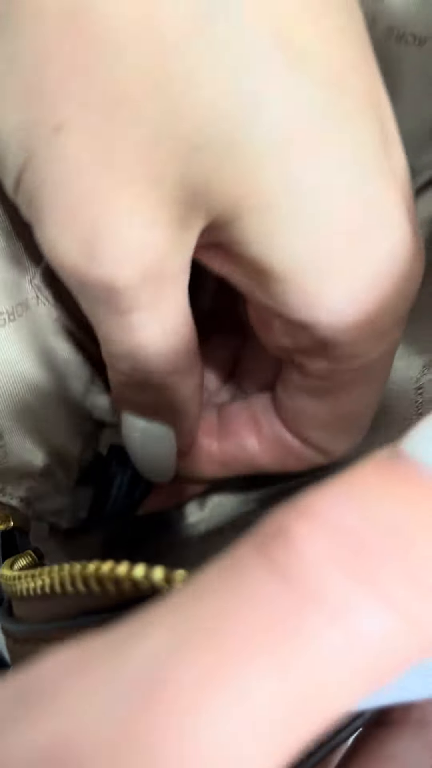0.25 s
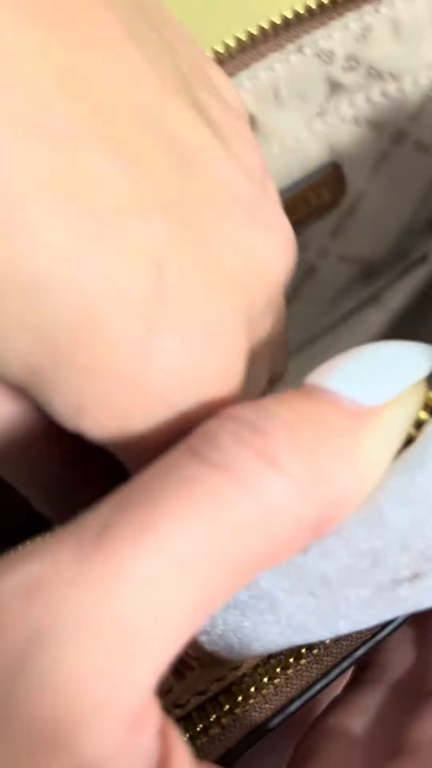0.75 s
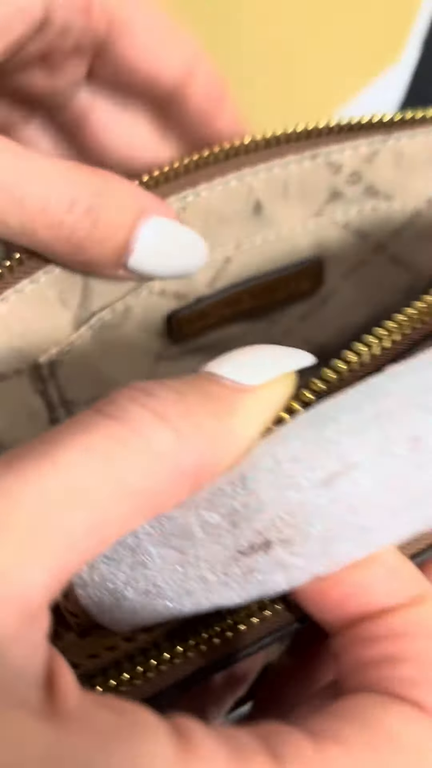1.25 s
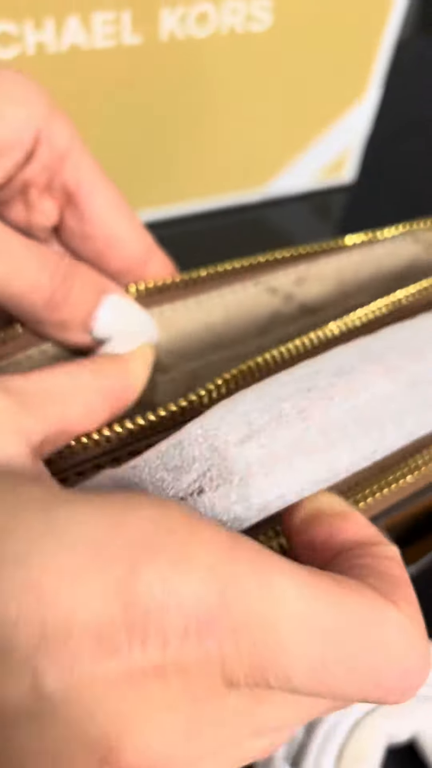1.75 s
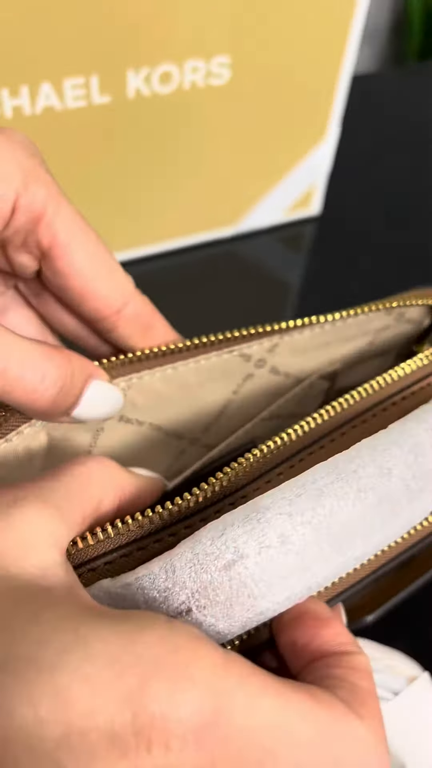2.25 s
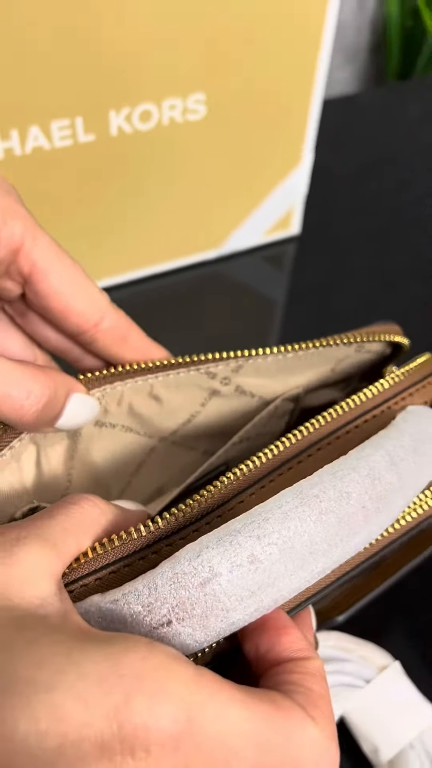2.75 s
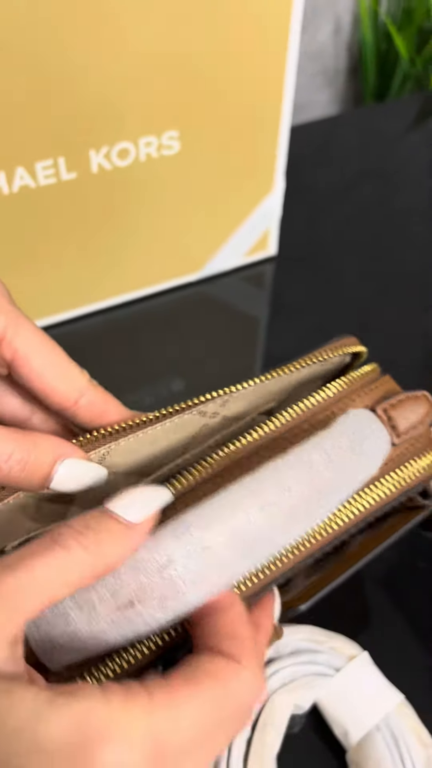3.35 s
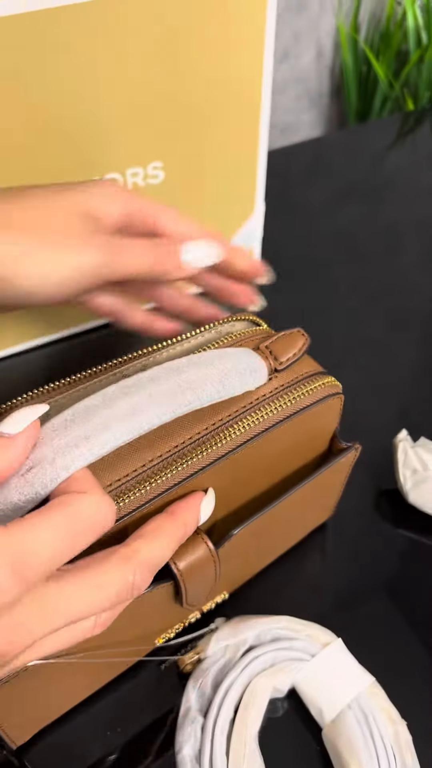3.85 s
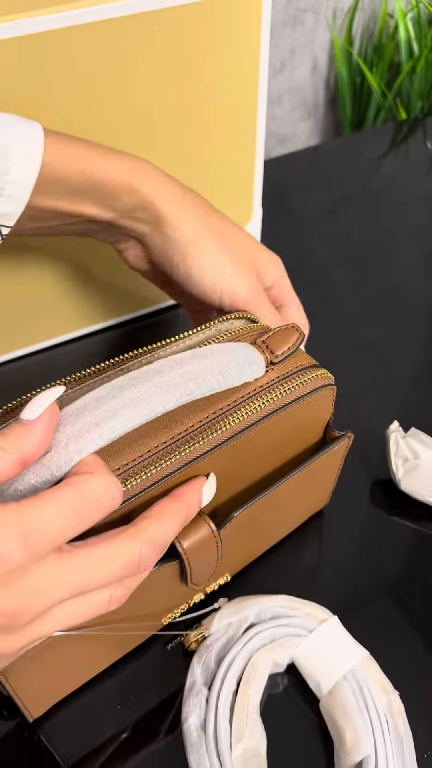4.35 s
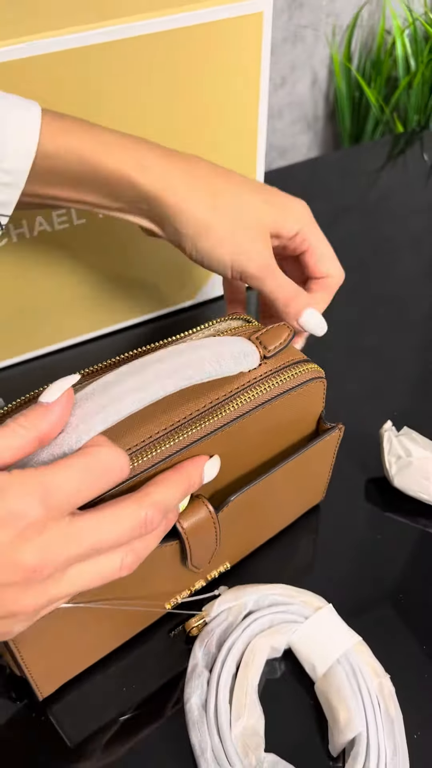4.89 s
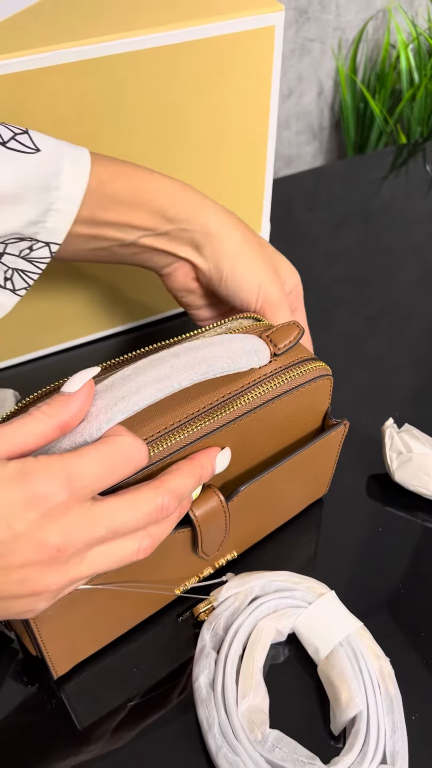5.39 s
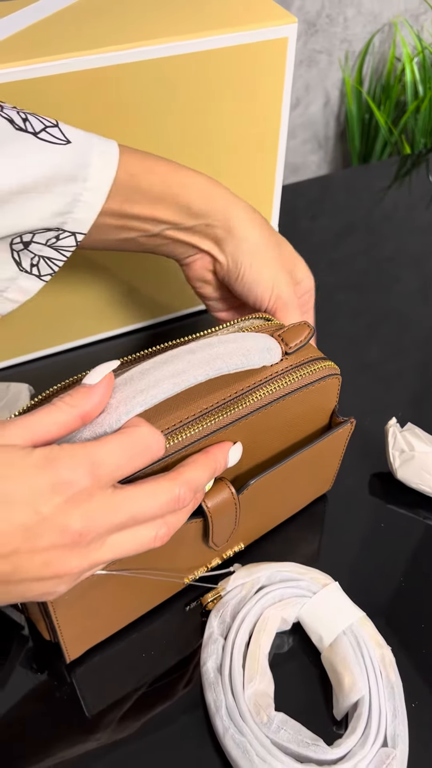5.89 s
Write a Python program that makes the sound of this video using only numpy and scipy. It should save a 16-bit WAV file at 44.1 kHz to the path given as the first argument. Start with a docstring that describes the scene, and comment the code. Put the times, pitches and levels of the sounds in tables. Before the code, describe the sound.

A close, dry recording in a small quiet room, with soft air murmur and a faint low hum throughout. From 0 to 1 s, fingers brush cloth lining in uneven swells, with quick little leather pops, low jostling and bright nail ticks. At about 1.0 s a fastener snaps shut, loud, crisp and briefly ringing; brushing peaks just after. Around 1.25 s a finger squeaks for a moment, turning raspy, and a much weaker snap follows at 1.4 s. Soft low double bumps on the table come at 1.5 and 1.6 s, another near 2.4 s among nail clicks. It is almost still from 2.5 to 3 s, then light rustling and creasing return. A firm leather pop at 4.0 s begins stronger creaking; zip metal jingles at 4.4 to 4.5 s. The hardest pop lands at 4.8 s, another at 5.0 s, then sparse ticks and a last jingle with pops near 5.9 s.

```python
"""Hands explore a small leather bag on a table in a quiet room, close to the microphone.
First fingers brush the cloth lining (filtered noise) among leather pops (buckling, falling pitch) and nail ticks.
From 1 s a fastener snaps twice (chatter and ringing modes), a finger squeaks (stick-slip), the bag bumps the table.
From 4 s the gripped leather pops and creaks hardest, and a metal zip pull jingles (dying partials).
Under it all lie a low jostling, the murmur of the room's air and a steady hum."""
import sys
import numpy as np
from scipy import signal
from scipy.fft import rfft, irfft
from scipy.io import wavfile
from scipy.ndimage import uniform_filter1d

SR = 44100
rng = np.random.default_rng(int(sys.argv[2]) if len(sys.argv) > 2 else 0)


def persist_wave(psi):
    """Save psi, clipped to +-1, as 16-bit WAV."""
    counts = np.round(np.clip(psi, -1, 1) * 32767).astype(np.int16)
    wavfile.write(sys.argv[1], SR, np.atleast_2d(counts).T)


N = 270333
TIME = np.arange(N) / SR  # s

# effort of the fingers brushing the cloth lining: (time [s], level [dB])
BRUSHING_EFFORT = [(0, -69.5), (.13, -61), (.36, -59.5), (.53, -53.5), (.75, -58), (.8, -69.5),
                   (.98, -60.5), (1.1, -51), (1.38, -69.5), (1.62, -56.5), (1.88, -64.5), (2.1, -69),
                   (2.38, -65), (2.55, -82), (2.95, -80.5), (3.11, -69.5), (3.29, -74), (3.42, -63.5),
                   (3.5, -66.5), (3.7, -58), (3.8, -66.5), (3.93, -63), (4.5, -75), (4.95, -94),
                   (5.17, -73), (5.48, -79), (5.67, -71.5), (5.8, -92), (6.13, -82)]
# effort of the grip rubbing the leather: (time [s], level [dB])
RUBBING_EFFORT = [(0, -67.5), (.28, -57.5), (.36, -68.5), (.49, -63), (.72, -60.5), (.82, -68.5),
                  (1.05, -59.5), (1.47, -58), (1.76, -60), (2.3, -79.5), (2.6, -100), (2.95, -84),
                  (3.22, -71.5), (3.3, -82), (3.65, -71), (3.98, -71.5), (4.04, -58.5), (4.29, -58.5),
                  (4.34, -60), (4.43, -62.5), (4.62, -67), (4.85, -58), (5.2, -67), (5.3, -71.5),
                  (5.5, -67), (5.6, -66.5), (5.77, -67.5), (5.84, -83), (5.91, -60.5), (5.97, -61),
                  (6.13, -65.5)]
# bending modes of the table: (frequency [Hz], relative level [dB], T60 [s])
TABLE_MODES = [(74, 0, 0.15), (181, -3, 0.26), (241, -2.5, 0.33), (292, -5, 0.28)]
# the bag's hollow body colours pops and creases: (frequency [Hz], relative level [dB])
PANEL_COLOUR = [(100, -1), (300, 0.5), (450, 2), (680, -7), (980, -1), (1500, -3.5), (2200, 2.5), (4000, 0)]
# air and walls of the bag, ringing on after a pop: (frequency [Hz], relative level [dB], T60 [s])
HOLLOW_MODES = [(390, -4, 0.13), (453, -3, 0.12), (485, -1.5, 0.26), (587.7, -4, 0.048), (654, 3, 0.16),
                (745, -5, .1)]
# dull body of a nail tick or a zip pull's knock: (frequency [Hz], relative density [dB per Hz])
DULL_COLOUR = [(150, -24), (500, -6.5), (1200, -0.5), (2200, -0.5), (4000, -24.5), (9000, -47.5)]


def gain_of(db):
    """Level definition: decibels to amplitude ratio."""
    return 10 ** (np.asarray(db) / 20)


def evened(x):
    """Power normalization: scales a signal to rms 1."""
    return x / np.sqrt(np.mean(x ** 2) + 1e-20)


def read(points, hz):
    """Interpolation on a logarithmic frequency axis."""
    table_hz, value = np.transpose(points)
    return np.interp(np.log(hz + 1), np.log(table_hz + 1), value)


def level_at(curve, s):
    """Linear interpolation of a level curve at times s."""
    return np.interp(s, *np.transpose(curve))


def add(mix, s, sound):
    """Superposition: mixes a sound in at time s."""
    part = mix[max(round(s * SR), 0):][:len(sound)]
    part += sound[:len(part)]


def colour(x, spectrum):
    """Minimum-phase filtering: the log spectrum fixes the phase of a causal response of unit energy."""
    hz = abs(np.fft.fftfreq(4096, 1 / SR))
    log_gain = np.log(gain_of(read(spectrum, hz)))
    minimum_phase = np.exp(np.conj(signal.hilbert(log_gain)))
    taps = np.fft.ifft(minimum_phase).real[:2048]
    return signal.oaconvolve(x, taps / np.linalg.norm(taps))[:len(x)]


def ring(x, modes):
    """Modal resonance: drives a set of exponentially dying sines of unit energy in all."""
    t = TIME[:SR // 2]
    response = sum(gain_of(db - 60 * t / t60) * np.sin(2 * np.pi * hz * t) for hz, db, t60 in modes)
    return signal.oaconvolve(x, response / np.linalg.norm(response))[:N]


def chatter(length, steep=1):
    """Contact noise: two hard parts meet in a run of tiny, uneven contacts that dies away."""
    t = TIME[:SR // 10]
    fade = np.exp(-(t / max(length, 1 / SR)) ** steep)
    burst = rng.standard_normal(len(t)) * fade
    return burst * np.linalg.norm(fade) / np.linalg.norm(burst)


def grains(per_s, spread_db):
    """Shot noise: sparse catches of very uneven size, rms 1."""
    size = gain_of(spread_db * np.minimum(rng.exponential(1, N), 4))
    sign = rng.choice([-1, 1], N)
    return evened(size * sign * (rng.random(N) < per_s / SR))


def strays(curve, per_s, over_db):
    """Random arrivals: small contacts whose level follows a hand's effort; rows (time [s], level [dB])."""
    spread_db, resting_effort_db = 4, -91  # even resting fingers make a few small contacts
    chance, size = rng.random(N), rng.standard_normal(N)
    at = chance < per_s / SR
    effort_db = np.maximum(level_at(curve, TIME[at]), resting_effort_db)
    return zip(TIME[at], effort_db + over_db + spread_db * np.clip(size[at], -2, 2))


def flex(hz, sag, rise, swell, steep):
    """Dispersion: fast bending waves arrive first, so the pitch falls. sag, rise and swell are in cycles."""
    cycles = hz * TIME[:SR // 15]
    envelope = (1 - np.exp(-cycles / rise)) * np.exp(-(cycles / swell) ** steep)
    return envelope * np.sin(2 * np.pi * sag * np.log1p(cycles / sag))


def ports(near, other=None):
    """Interaural coherence at two microphone ports; a second, unrelated signal makes the sound diffuse."""
    # likeness of diffuse sound at the ports: (frequency [Hz], coherence [1])
    likeness = [(80, 0.98), (300, 0.41), (1000, 0.46), (2500, 0.12), (4500, 0.079), (6200, 0.5), (7800, .9),
                (10000, 0.096), (12500, 0.99), (15500, 1)]
    # lead of the left port: (frequency [Hz], phase [rad])
    port_phase = [(100, 0), (600, .2), (1500, .3), (4500, -.6), (7000, -.3), (8500, -.75), (10000, -1.6),
                  (11500, -2.6), (12500, -3.05), (15000, -3.0), (16000, -2.3)]
    hz, left = np.fft.rfftfreq(2 * N, 1 / SR), rfft(near, 2 * N)
    right = left
    if other is not None:
        same = np.clip(read(likeness, hz), -1, 1)
        right = same * left + np.sqrt(1 - same ** 2) * rfft(other, 2 * N)
    return irfft([left, right * np.exp(-1j * read(port_phase, hz))])[:, :N]


def room(x, wet_db):
    """Reverberation: direct sound plus a small room's tail, each band dying at its own speed."""
    # reverberation time: (frequency [Hz], T60 [s])
    decay_times = [(150, 0.42), (500, 0.24), (1500, 0.18), (4000, 0.27), (10000, 0.11), (16000, 0.1)]
    taps = rng.standard_normal((2, SR // 2)) * (rng.random((2, SR // 2)) < .15)  # sparse echoes
    taps *= np.clip(TIME[:SR // 2] / 0.0017, 0, 1) ** 2  # which build up over 1.7 ms
    hz, t, bands = signal.stft(taps, SR, nperseg=256)
    decay = gain_of(-60 * t / read(decay_times, hz)[:, None])
    tails = signal.istft(bands * decay, SR)[1]
    echoes = (signal.oaconvolve(x, tail / np.linalg.norm(tail))[:N] for tail in tails)
    return ports(x) + gain_of(wet_db) * ports(*echoes)


def snaps():
    """Impact excitation: the fastener chatters shut, rings, and shakes the table a little."""
    # fastener closures: (time [s], relative level [dB], chatter decay [s])
    closures = [(1.026, -7.5, 0.0055), (1.4309, -23, 0.011)]
    # modes of the fastener: (frequency [Hz], relative level [dB], T60 [s])
    fastener_modes = [(1560, -16.5, 0.14), (2338, 1, 0.11), (2600, -1, 0.1), (2708, -3, .09),
                      (3157, -3.5, 0.1), (3286, -2, .14), (3543, 1, 0.11), (4007, 0, 0.075),
                      (5547, -3, .09), (6165, -2, .11), (6278, -6, .11), (6479, -2, .1), (7735, -4.5, 0.13),
                      (8316, -3, 0.1)]
    # chatter: (frequency [Hz], relative density [dB per Hz])
    snap_colour = [(80, -28), (200, -11), (450, -13), (900, -12), (1300, -11), (1800, -13.5), (2500, -10),
                   (3600, -6.5), (4800, -10), (6000, -8.5), (8500, -11.5), (11000, -13.5), (13000, -12.5),
                   (16000, -23.5)]
    # snap as the folds scatter it: (frequency [Hz], relative density [dB per Hz])
    scatter_colour = [(700, -28.5), (1500, -16.5), (2400, -2), (4500, -2.5), (6500, -14), (16000, -32.5)]
    blows, strikes = np.zeros((2, N)), np.zeros(N)
    for s, db, length in closures:
        add(strikes, s, gain_of([db]))
        for path in blows:
            add(path, s, gain_of(db) * chatter(length, steep=1.8))
    crack = gain_of(-3.5) * colour(blows[0], snap_colour)
    ringing = gain_of(8) * ring(strikes, fastener_modes)
    shaking = gain_of(-4.0) * ring(strikes, TABLE_MODES[2:])
    # the bag's folds send the upper middle unevenly to the ports
    scattered = gain_of(-9.0) * colour(blows[1], scatter_colour)
    return room(crack + ringing + shaking, wet_db=-4.0) + np.array([scattered, -scattered])


def pops():
    """Buckling instability: stiff leather gives way with a falling knock and a little grit."""
    # panel pops: (time [s], relative level [dB], starting pitch [Hz], length [cycles])
    panel_pops = [(0.019, -45, 2300, 6.3), (0.1044, -39, 1790, 12), (0.207, -44, 1580, 9.2),
                  (0.251, -42.5, 1304, 12), (0.393, -44, 2900, 5.3), (0.448, -41, 2100, 21),
                  (0.48, -40.5, 1460, 10), (0.501, -45, 2000, 8), (0.526, -43, 3020, 6.8),
                  (0.572, -45, 2420, 12), (0.615, -44, 2570, 12), (0.64, -46, 2730, 6.3),
                  (0.654, -35, 2780, 5.4), (0.679, -44, 1890, 10), (0.713, -51.5, 2000, 8),
                  (1.22, -32, 1950, 19), (1.359, -44, 1520, 7.8), (1.384, -43, 2500, 6.9),
                  (1.402, -46, 1790, 7.2), (2.839, -56, 1484, 8.3), (3.134, -52.5, 1590, 7.3),
                  (3.211, -48, 2500, 7), (3.654, -41.5, 2610, 6.4), (4.011, -25, 2270, 18.4),
                  (4.085, -39, 2200, 12), (4.197, -41, 2410, 12), (4.2229, -30.5, 2890, 9),
                  (4.24, -36.5, 2890, 16), (4.255, -34, 2900, 10), (4.271, -37.5, 2540, 14),
                  (4.3095, -49, 2700, 11), (4.397, -35.5, 1740, 13.4), (4.407, -36, 1800, 13),
                  (4.529, -36.5, 1630, 16), (4.549, -37, 1540, 9.7), (4.562, -44.5, 1800, 14),
                  (4.664, -53, 2400, 8), (4.719, -48, 1500, 8), (4.8117, -10.5, 2106, 16.7),
                  (4.9909, -23, 1930, 18), (5.051, -45, 2050, 12), (5.107, -35.5, 1870, 16),
                  (5.15, -41.5, 2393, 13.3), (5.1735, -34.5, 2000, 25), (5.223, -49, 2200, 10),
                  (5.571, -45, 2390, 7.4), (5.578, -41.5, 3000, 11), (5.597, -47.5, 3000, 7),
                  (5.756, -50, 1600, 9), (5.897, -33, 1680, 15), (5.912, -43, 1180, 12),
                  (5.958, -37.5, 1720, 17), (6.0, -48, 2430, 10), (6.061, -44.5, 2400, 6.2)]
    # grit: (frequency [Hz], relative density [dB per Hz])
    grit_colour = [(60, -15.5), (150, 4), (260, 7.5), (420, 10), (1800, 3), (2900, -6.5), (4000, -17.5),
                   (9000, -43.5), (16000, -27.5)]
    small_per_s, small_over_db, small_hz, small_cycles = 17, 3.5, 1970, 3  # short stray pops while rubbing
    grit_db, grit_follows = -25, 0.62  # grit of a 0 dB pop; dB of grit per dB of pop
    knock, grit = np.zeros((2, N))
    small = [(s, db, small_hz, small_cycles) for s, db in strays(RUBBING_EFFORT, small_per_s, small_over_db)]
    for s, db, hz, cycles in panel_pops + small:
        add(knock, s, gain_of(db) * flex(hz, sag=4.3, rise=1.5, swell=cycles, steep=4))
        # softer pops hold a larger share of grit, up to a limit
        level_db = min(grit_db + grit_follows * db, db - 9.5)
        add(grit, s, gain_of(level_db) * chatter(0.0032))
    body = gain_of(-7.0) * colour(knock, PANEL_COLOUR) + gain_of(-35.0) * ring(knock, HOLLOW_MODES)
    return room(body + gain_of(2.0) * colour(grit, grit_colour), wet_db=-10.0)


def crunches():
    """Cascading buckling: squeezed leather gives way in tiny creases, each a miniature pop, over fine grit."""
    # squeezes: (time [s], length [s], relative level [dB], pitch of the creases [Hz])
    squeezes = [(0.48, 0.028, -64, 1670), (1.334, 0.18, -58.5, 940), (2.365, 0.031, -49, 1607),
                (3.08, 0.079, -61, 1700), (3.179, 0.067, -58.5, 1600), (3.523, 0.072, -62, 1920),
                (3.601, 0.1, -54.5, 1880), (3.703, 0.058, -51.5, 1880), (3.761, 0.055, -58.5, 1300),
                (4.171, 0.15, -55.5, 1090), (4.378, 0.048, -50.5, 1300), (4.526, 0.051, -64, 1195),
                (4.746, 0.046, -56, 2304), (4.785, 0.029, -44.5, 1382), (5.9, 0.017, -52.5, 945),
                (5.932, 0.06, -53.5, 1030)]
    # grit of creasing leather: (frequency [Hz], relative density [dB per Hz])
    grit_colour = [(150, -36.5), (400, 12), (1000, 2.5), (2000, 5.5), (3500, -4.5), (7000, -7),
                   (11000, -9.5), (14000, -13)]
    creases_per_s, spread_db, spread_oct = 220, 10, .8
    squeeze, creases = np.zeros((2, N))
    for s, length, db, hz in squeezes:
        add(squeeze, s, gain_of(db) * signal.windows.tukey(int(length * SR), .6))
        chance = rng.uniform(-1.3, 1, size=(100, 4))
        for at, (late, size, pitch, side) in zip(np.arange(0, length, 1 / creases_per_s), chance):
            strength = np.sqrt(np.sin(np.pi * at / length)) * gain_of(db + spread_db * size)
            crease = flex(hz * 2 ** (spread_oct * pitch), sag=4.3, rise=.8, swell=3.5, steep=2)
            add(creases, s + at + late / creases_per_s, np.sign(side) * strength * crease)
    grit = colour(squeeze * grains(per_s=1500, spread_db=3), grit_colour)
    body = gain_of(2) * colour(creases, PANEL_COLOUR) + gain_of(-24) * ring(creases, HOLLOW_MODES)
    return room(body + gain_of(-8.5) * grit, wet_db=-9)


def jingles():
    """Modal detuning: the zip pull scrapes and knocks; the grip shifts its partials at every contact."""
    # the pull knocks on its ring: (time [s], relative level [dB], dull knock against the bag re level [dB],
    # ringing that the fingers leave undamped re level [dB])
    tugs = [(4.372, -23.5, -5.5, -17), (4.386, -29, -10, -8), (4.395, -22, -19, -5.5), (4.414, -41, -5, -5),
            (4.523, -26, -9, -8), (4.529, -31, -3, 0), (4.796, -46, 1, 0), (4.8, -34, -4, -7),
            (4.811, -32, -5, -9), (4.828, -37, -3, -4), (5.726, -43, -8, -14), (5.7345, -29, -13.5, -5),
            (5.879, -30.5, -12, -11), (5.886, -34.5, -8, -6), (5.894, -24.5, -20.5, 2.5),
            (5.911, -41, -7, -2)]
    # modes of the pull: (frequency [Hz], relative level [dB], T60 [s])
    pull_modes = [(7270, 8, 0.16), (7180, 5, 0.13), (9950, 6, 0.06), (10400, 7, .035), (11600, 7, 0.03),
                  (15560, 15, 0.11), (15350, 10, .05)]
    # scrape: (frequency [Hz], relative density [dB per Hz])
    rattle_colour = [(800, -5), (2500, -11.5), (4000, -5.5), (7000, -3.5), (8500, -2), (10000, 1.5),
                     (11700, 13), (13500, 0), (15500, 4.5), (16300, -17)]
    rattle, knock, singing = np.zeros((3, N))
    t = TIME[:SR // 4]
    onset = np.minimum(TIME[:SR // 10] / 0.0033, 1)  # each contact has a soft onset of 3.3 ms
    hz, mode_db, t60 = np.transpose(pull_modes)[:, :, None]
    shifts = rng.standard_normal((len(tugs), 2, len(pull_modes), 1))
    for (s, db, knock_db, ring_db), (grip, force) in zip(tugs, shifts):
        add(rattle, s, gain_of(db) * onset * chatter(0.0032, steep=1.5))
        add(knock, s, gain_of(db + knock_db) * onset * chatter(0.0022, steep=3.7))
        envelope = gain_of(mode_db + 2 * force - 60 * t / t60)
        partials = envelope * np.sin(2 * np.pi * hz * (1 + .006 * grip) * t)
        add(singing, s, gain_of(db + ring_db) * partials.sum(0))
    metal = gain_of(-6.0) * colour(rattle, rattle_colour) + gain_of(-34) * singing
    return room(metal + gain_of(-3.5) * colour(knock, DULL_COLOUR), wet_db=-4.0)


def bumps():
    """Momentum transfer: soft low double blows with a dull scuff, which leave the table humming."""
    # the bag meets the table: (time [s], relative level [dB], starting pitch [Hz])
    landings = [(0.271, -49, 392), (1.218, -48.5, 363), (1.461, -29, 215), (1.582, -27, 255.4),
                (2.383, -37.5, 263.3), (3.716, -44, 310), (5.175, -50, 397), (5.728, -48.5, 266)]
    rock_s, rock_db = 0.01203, -4.5  # the bag rocks onto its other edge just after it lands
    # scuff: (frequency [Hz], relative density [dB per Hz])
    scuff_colour = [(60, -32), (280, 7.0), (450, -8.0), (1200, -29.5)]
    push, scuff = np.zeros((2, N))
    for s, db, hz in landings:
        blow = gain_of(db) * flex(hz, sag=1.5, rise=1, swell=3.1, steep=3)
        add(push, s, blow)
        add(push, s + rock_s, gain_of(rock_db) * blow)
        add(scuff, s, gain_of(db) * chatter(0.024))
    thud = gain_of(4.5) * push + gain_of(-13.5) * colour(scuff, scuff_colour)
    return room(thud + gain_of(-14.5) * ring(push, TABLE_MODES), wet_db=-15.0)


def ticks():
    """Hard contact: a nail on zip teeth or trim gives a bright edge and a duller body beneath it."""
    # nail clicks: (time [s], relative level [dB], body re edge before colouring [dB])
    clicks = [(0.02, -44, -32.5), (0.077, -48, -11), (0.261, -40.5, -22), (0.512, -38, -29),
              (0.756, -41.5, -32), (0.836, -41, -32), (0.9291, -40.5, -13), (0.983, -37, -14),
              (1.189, -38, -36), (1.734, -33, -23), (1.805, -43.5, -19.5), (2.034, -59, -10),
              (2.164, -44.5, -4), (2.178, -42, -12.5), (2.241, -40.5, -28.5), (2.257, -29, -18),
              (2.3452, -36.5, -15), (2.3516, -32.5, -12.5), (2.392, -48, -23.5), (2.426, -31.5, -12),
              (2.706, -54, -9), (3.047, -36.5, -23), (3.166, -56, -15.5), (3.574, -48.5, -12),
              (3.617, -50, -7), (3.681, -46, -9), (3.698, -37, -5.5), (3.714, -41, -6.5),
              (4.1895, -38, -12), (4.256, -49.5, -6), (4.3107, -47.5, -1), (4.714, -55, -15),
              (4.73, -46.5, -11.5), (4.993, -65, -16), (5.0722, -46, -5), (5.1738, -51, 2),
              (5.223, -61.5, 1), (5.352, -56.5, -5), (5.3797, -42.5, -9.5), (5.5045, -42.5, -10.5),
              (5.589, -50.5, -6.5), (5.632, -44, -29), (5.638, -41, -36)]
    # edge: (frequency [Hz], relative density [dB per Hz])
    edge_colour = [(800, -25), (2500, -7.5), (4000, -4), (8000, 1.5), (11000, 2.5), (13000, 9),
                   (16000, -11.5)]
    chatter_s = .0014  # decay of a nail's chatter on the metal
    small_per_s, small_over_db, small_body_db = 3.7, 4, -7.5  # stray ticks while brushing
    edge, body = np.zeros((2, N))
    small = [(s, db, small_body_db) for s, db in strays(BRUSHING_EFFORT, small_per_s, small_over_db)]
    for s, db, body_db in clicks + small:
        add(edge, s, gain_of(db) * chatter(chatter_s))
        add(body, s, gain_of(db + body_db) * chatter(2 * chatter_s))
    bright = gain_of(-1.0) * colour(edge, edge_colour)
    return room(bright + gain_of(2.0) * colour(body, DULL_COLOUR), wet_db=-10.5)


def squeak():
    """Stick-slip: a nearly pure squeak turns to an uneven rasp as the finger presses harder."""
    # leather under a finger: (time [s], relative level [dB], pitch [Hz])
    slip_path = [(1.246, -56, 640), (1.259, -42, 660), (1.276, -39, 690), (1.284, -38, 630),
                 (1.292, -35, 560), (1.304, -35.5, 540), (1.311, -50, 440)]
    # overtones of a harsh slip: (multiple [1], relative level [dB])
    harsh_overtones = [(2, -9), (3, -11), (4, -22), (5, -25)]
    # rasp: (frequency [Hz], relative density [dB per Hz])
    rasp_colour = [(200, -46), (420, -22), (750, 34), (1050, 23), (1400, -20), (1800, 7), (2500, -25),
                   (3100, -5), (4500, -22), (9000, -35)]
    fully_harsh_db = -33.5  # harshness grows with amplitude up to this path level
    s, db, hz = np.transpose(slip_path)
    jitter = evened(uniform_filter1d(rng.standard_normal(N), 40))
    level = gain_of(np.interp(TIME, s, db)) * (TIME > s[0]) * (TIME < s[-1])
    harsh = np.minimum(level / gain_of(fully_harsh_db), 1)
    turns = np.cumsum(np.interp(TIME, s, hz) * (1 + .17 * harsh * jitter)) / SR
    tone = np.sin(2 * np.pi * turns)
    overtones = sum(gain_of(db) * np.sin(2 * np.pi * k * turns) for k, db in harsh_overtones)
    slips = np.diff(np.floor(turns), prepend=0) * (1 + .7 * rng.standard_normal(N))  # one pulse a cycle
    rasp = gain_of(-3) * harsh * evened(colour(slips, rasp_colour))
    catches = 1 + .35 * np.cos(2 * np.pi * turns / 6)  # the strength swells once in six cycles
    return room((np.sqrt(2) * (tone + harsh ** 2 * overtones) + rasp) * catches * level, wet_db=-13.5)


def friction(spectrum, per_s, spread_db, grain_db, flutter_db):
    """Sliding friction: a smooth hiss and small catches, both under an unsteady pressure; rms 1."""
    # the hands start right under the microphone: (time [s], share of direct sound in the hiss's power [1])
    nearness = [(.7, 0.56), (1.2, 0.2), (3, 0.052)]
    catches = gain_of(grain_db) * grains(per_s, spread_db)
    pressure = gain_of(flutter_db * evened(uniform_filter1d(rng.standard_normal(N), 700)))
    direct, *diffuse = (colour(pressure * noise, spectrum) for noise in rng.standard_normal((3, N)))
    near = np.clip(level_at(nearness, TIME), 0, 1)
    hiss = np.sqrt(near) * ports(direct) + np.sqrt(1 - near) * ports(*diffuse)
    return evened(hiss + room(colour(pressure * catches, spectrum), wet_db=-1.5))


def hands():
    """Friction noise grows with effort: fingers brush the lining, the grip rubs and jostles the bag."""
    # cloth lining: (frequency [Hz], relative density [dB per Hz])
    lining_colour = [(300, -20.5), (1200, 3), (2500, 0), (4000, -0.5), (5000, -3.5), (6300, -1),
                     (8500, -4.5), (12000, 0.5), (15500, -16.5), (16500, -27.5)]
    # rubbed leather: (frequency [Hz], relative density [dB per Hz])
    leather_colour = [(120, -9.5), (300, -2.5), (550, 5), (1100, -9.5), (2000, -10.5), (3500, -26),
                      (8000, -51.5)]
    # jostled bag: (frequency [Hz], relative density [dB per Hz])
    rumble_colour = [(25, -17), (60, 8.5), (100, 0), (180, -4.5), (250, -3), (400, -24), (1000, -55.5)]
    ordinary_grip_db, ordinary_rumble_db = -64.5, -61.5  # rubbing level and the jostling that goes with it
    rumble_follows = .4  # dB of jostling gained per dB of rubbing
    lining_db, leather_db = level_at(BRUSHING_EFFORT, TIME), level_at(RUBBING_EFFORT, TIME)
    rumble_db = ordinary_rumble_db + rumble_follows * (leather_db - ordinary_grip_db)
    brushing = friction(lining_colour, per_s=700, spread_db=4, grain_db=-2.5, flutter_db=2)
    rubbing = friction(leather_colour, per_s=260, spread_db=3.5, grain_db=3.5, flutter_db=2.5)
    jostling = friction(rumble_colour, per_s=62, spread_db=1.5, grain_db=-10.0, flutter_db=4.5)
    return gain_of(lining_db) * brushing + gain_of(leather_db) * rubbing + gain_of(rumble_db) * jostling


def hisses():
    """Band-shaped noise: brief hisses of sliding cloth, squeaking leather and the ringing zip pull."""
    # short hisses around a centre frequency: (time [s], length [s], relative level [dB],
    # centre of the hiss [Hz], centre re the rest of the band [dB])
    hiss_bursts = [(0.256, 0.064, -49, 6500, 10.5), (1.279, 0.024, -57.5, 6400, 27),
                   (3.181, 0.037, -57, 6030, -3.5), (3.328, 0.082, -62.5, 6440, 5),
                   (3.667, 0.13, -62, 6500, 3.5), (5.152, 0.23, -80, 4460, 31),
                   (5.369, 0.044, -66, 7350, 19.5), (5.496, 0.069, -70.5, 7350, 23)]
    out = np.zeros(N)
    for s, length, db, hz, focus_db in hiss_bursts:
        band = [(hz / 8, -focus_db), (hz / 1.5, -focus_db), (hz, 0), (hz * 1.4, -focus_db),
                (14500, -focus_db - 1), (16500, -focus_db - 20)]
        hiss = colour(rng.standard_normal(SR // 4), band)
        samples = int(length * SR)
        add(out, s, gain_of(db) * np.resize(hiss, samples) * signal.windows.tukey(samples, .7))
    return room(out, wet_db=-8.0)


def room_tone():
    """Diffuse field: the low steady murmur of the room's air, and a pure hum."""
    # murmur: (frequency [Hz], relative density [dB per Hz])
    air_colour = [(15, -39), (25, -7), (72, -3.5), (145, -19.5), (249, -19), (363, -25), (659, -34),
                  (1040, -32), (1560, -29), (2990, -39), (11600, -46.5), (13200, -59), (16000, -58.5)]
    air_db, hum_hz, hum_db = -68, 47.1, -66  # rms levels ahead of the recorder
    air = evened(ports(*(colour(noise, air_colour) for noise in rng.standard_normal((2, N)))))
    hum = np.sqrt(2) * np.sin(2 * np.pi * hum_hz * TIME)
    return gain_of(air_db) * air + gain_of(hum_db) * hum


def scene():
    """Superposition of all sounds of the bag over the room tone."""
    blows = snaps() + bumps() + pops() + ticks() + jingles()
    return blows + squeak() + crunches() + hands() + hisses() + room_tone()


def record(dry):
    """Band limiting: the recorder's bass cut at 42 Hz and treble edge at 16.6 kHz."""
    cut = signal.sosfilt(signal.butter(4, 42, "highpass", fs=SR, output="sos"), dry)
    treble_edge = signal.firwin(511, 16600, window=("kaiser", 9), fs=SR)
    return signal.oaconvolve(cut, treble_edge[None], "same")


dry = scene()
out = record(dry)
persist_wave(out)
```